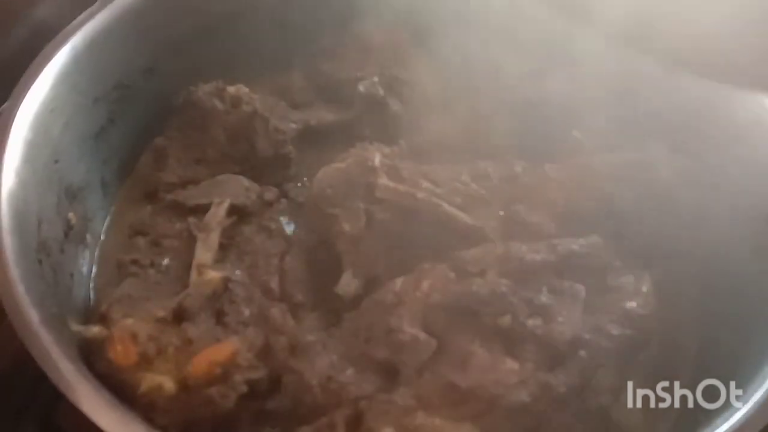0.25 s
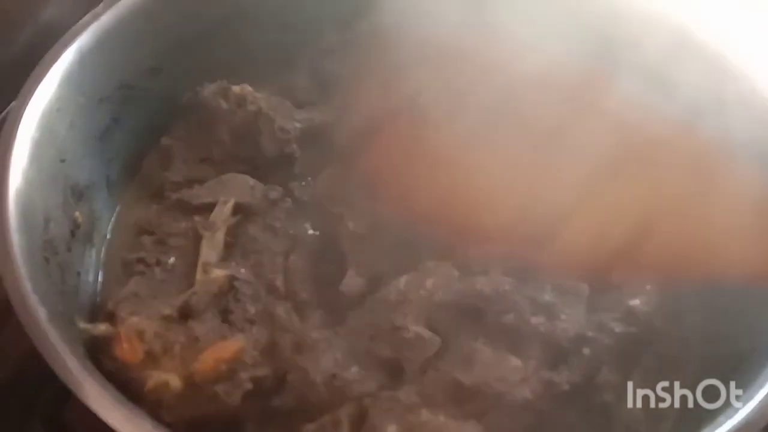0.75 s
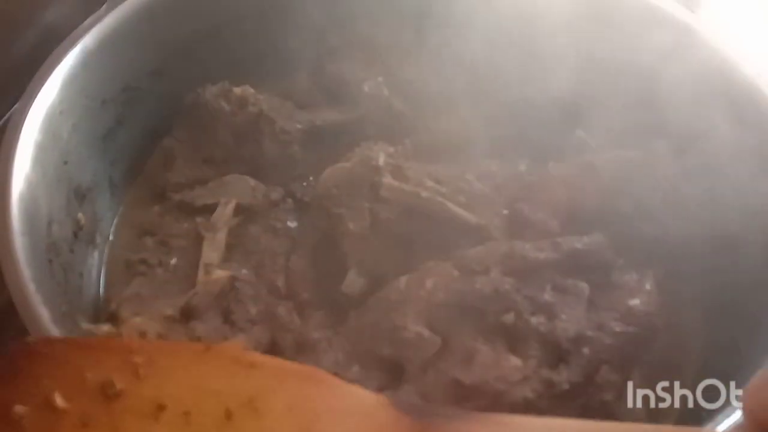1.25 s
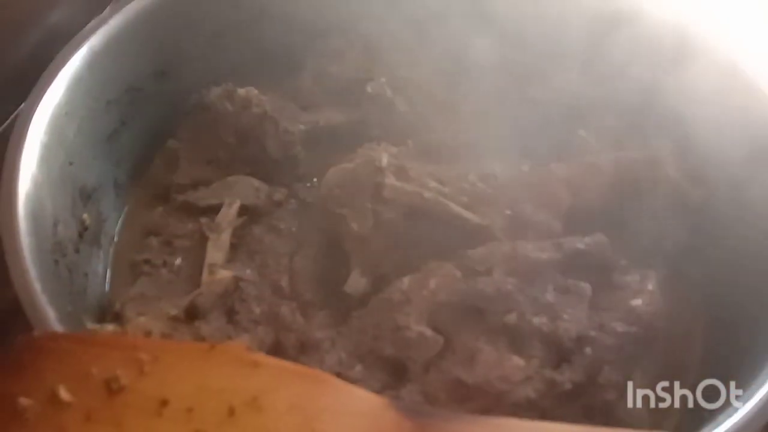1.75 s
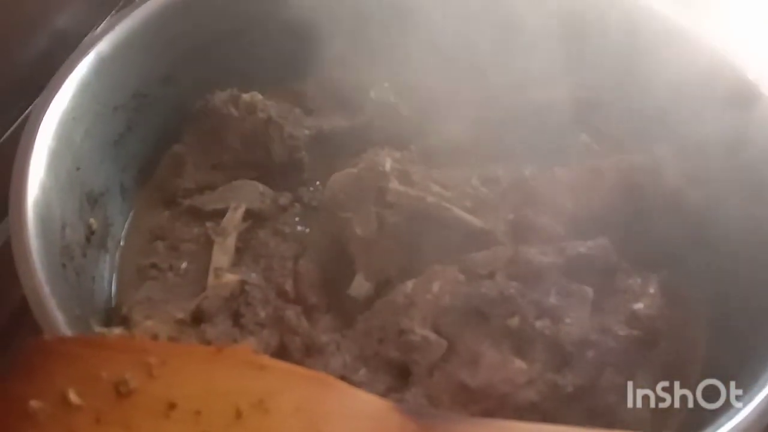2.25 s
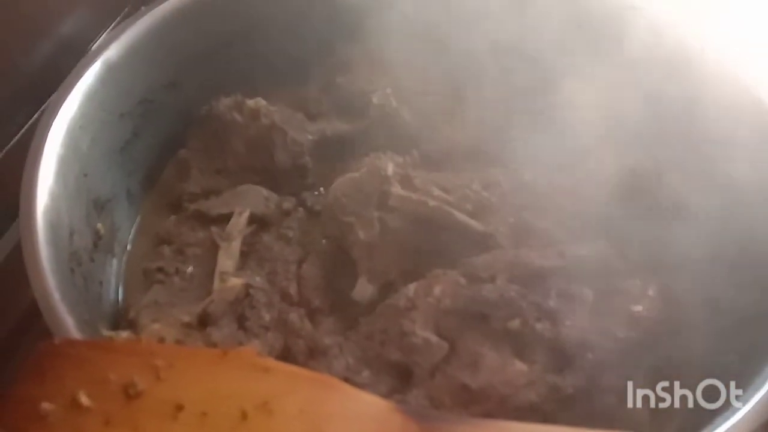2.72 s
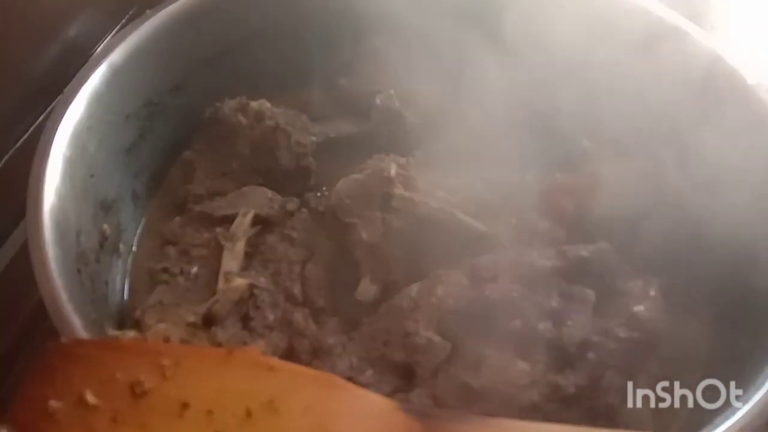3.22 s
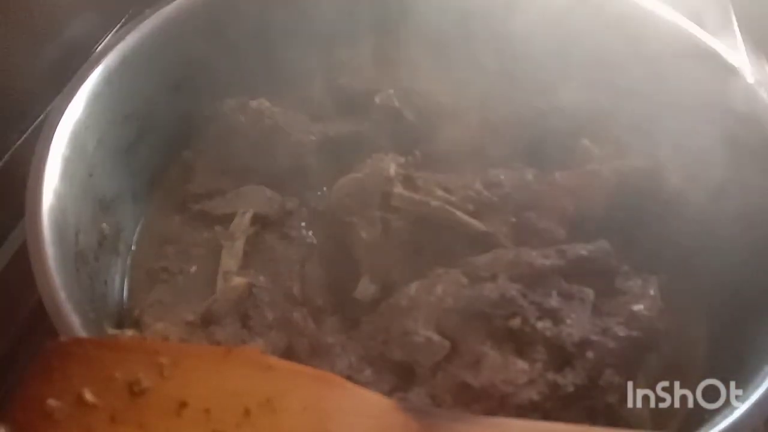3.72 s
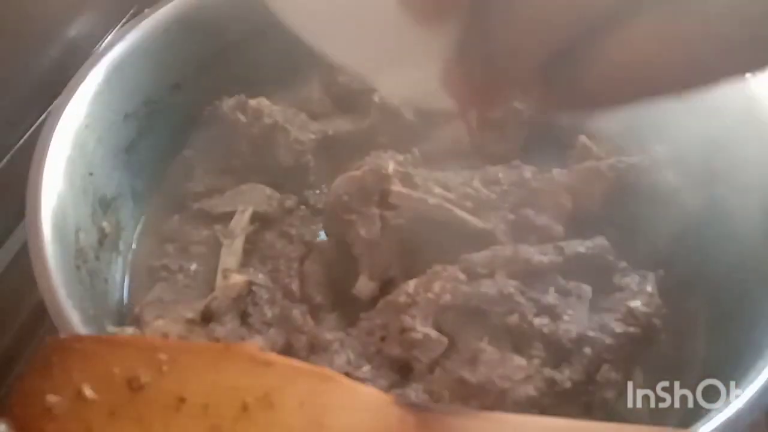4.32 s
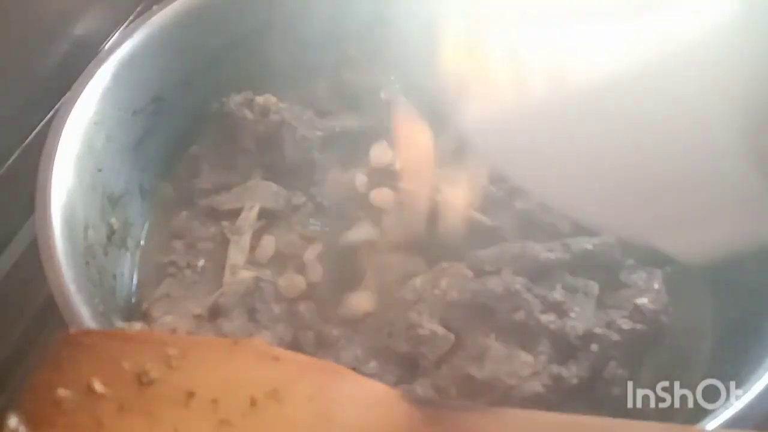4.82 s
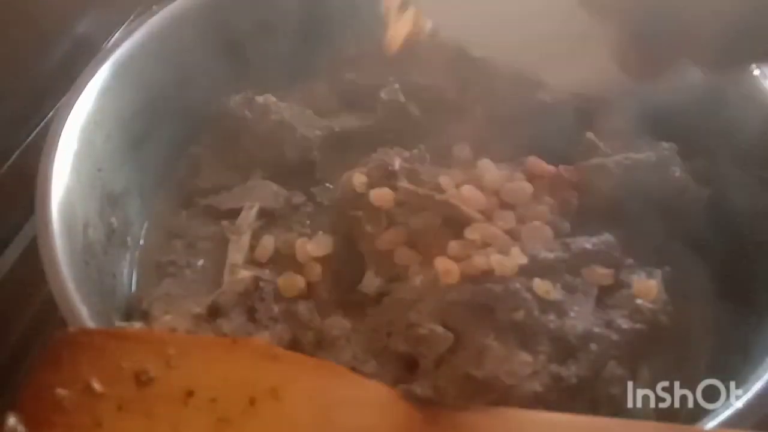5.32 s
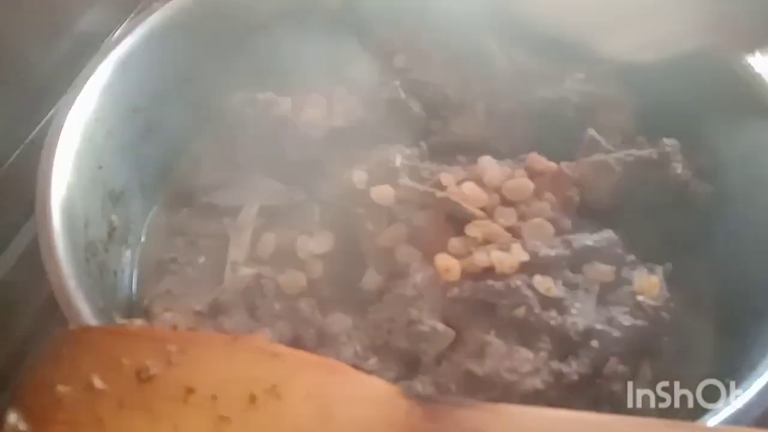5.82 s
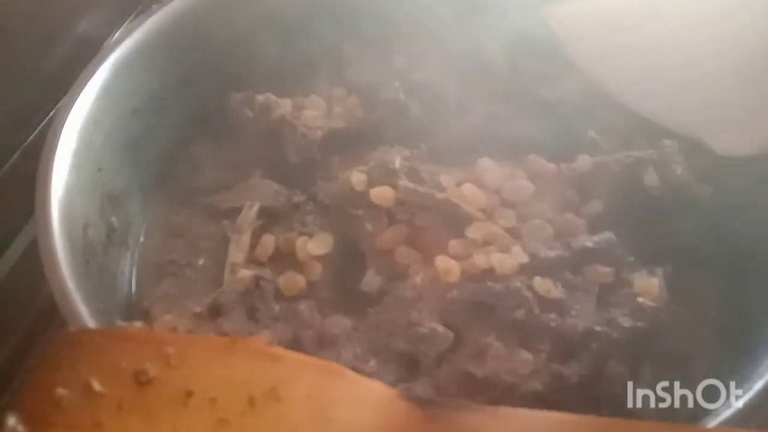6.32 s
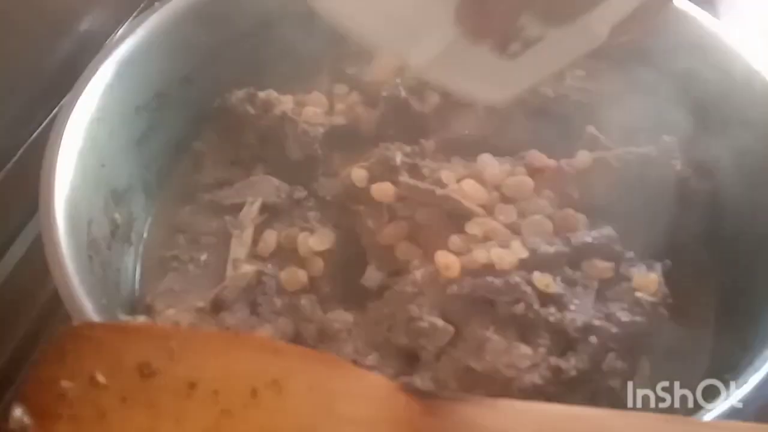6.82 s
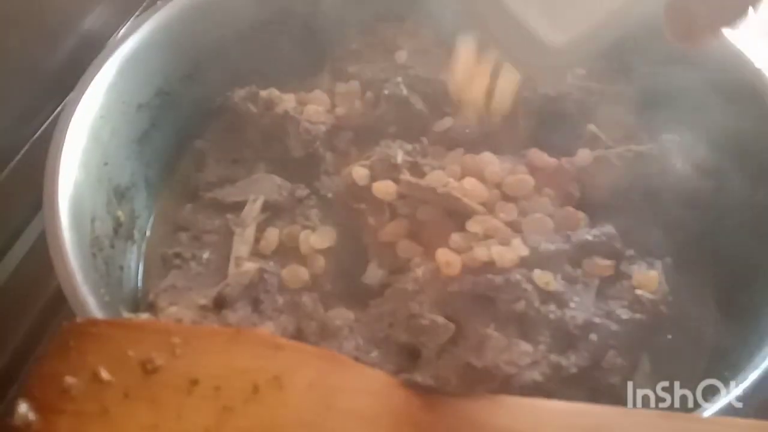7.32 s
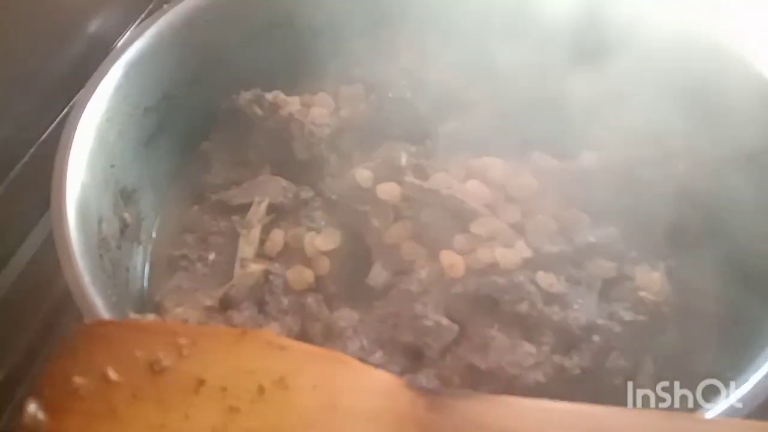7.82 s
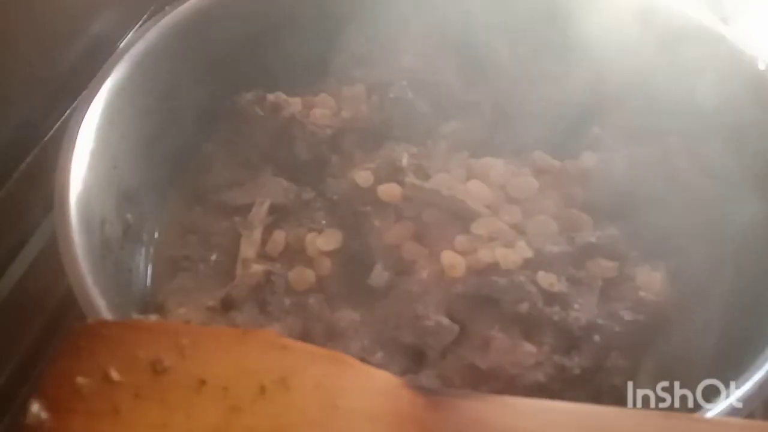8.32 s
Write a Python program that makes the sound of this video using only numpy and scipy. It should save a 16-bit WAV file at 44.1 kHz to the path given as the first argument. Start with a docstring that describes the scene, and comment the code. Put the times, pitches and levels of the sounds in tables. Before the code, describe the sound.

Close simmering, with muffled bubbles and fizzing fat; soft pot knocks and a scuff, later tapping chickpeas, a bright clank and a short steamy hiss.

```python
"""Meat simmers in thick sauce in a steel pot, heard close up: damped-sine bubbles plop and noisy fat fizzes,
with sharp filtered clicks as ticks and snaps. Early on, blows ring the pot's damped modes, then something scuffs
past it as filtered noise in jerks. Later, chickpeas tap and rattle out of a small dish (short modes) and land on the
meat and in the sauce (low bubble-like grains), and the dish clanks on the rim. It scrapes lightly as it is tipped
again. Near the end, a splash of sauce hisses on the hot wall as crackling, filtered noise."""
import sys
import numpy as np
from scipy import signal
from scipy.fft import rfft, irfft, next_fast_len
from scipy.io import wavfile

SR = 44100
rng = np.random.default_rng(int(sys.argv[2]) if len(sys.argv) > 2 else 0)


def generate_wav(signal):
    """Clip the signal to [-1, 1] and save it as 16-bit WAV at the path in sys.argv[1]."""
    frames = np.transpose(np.atleast_2d(signal))
    scaled = np.clip(frames, -1, 1) * 32767
    pcm = np.round(scaled).astype(np.int16)
    wavfile.write(sys.argv[1], SR, pcm)


N = 377363
T = np.arange(int(0.7 * SR)) / SR  # time within one event [s]
ATTACK_S = 0.0017  # time constant of a quick rise


def amp(db):
    """Level: decibels to linear gain."""
    return 10 ** (np.asarray(db) / 20)


def unit(x):
    """Normalisation: scale to rms 1."""
    return x / np.sqrt(np.mean(x ** 2) + 1e-20)


def crest(x):
    """Normalisation: scale to peak 1."""
    return x / (np.abs(x).max() + 1e-12)


def along(points, hz):
    """Interpolation of (frequency [Hz], value) points on a logarithmic frequency axis."""
    f, v = np.transpose(points)
    return np.interp(np.log(hz + 1), np.log(f + 1), v)


def gains(rows, outside=None):
    """Level contour: one gain per sample from (time [s], level [dB]) points."""
    s, db = np.transpose(rows)
    return amp(np.interp(np.arange(N) / SR, s, db, outside, outside))


def wobble(rate, size=N):
    """Random modulation: straight lines between normal random knots, rate a second."""
    knots = rng.standard_normal(int(size * rate / SR) + 4)
    return np.interp(np.arange(size) * rate / SR, np.arange(len(knots)), knots)


def colour(x, spectrum, tilt_db=0):
    """Minimum-phase filtering: a folded cepstrum makes it causal; the tilt [dB/octave] starts at 1 kHz."""
    size = 2 * next_fast_len(len(x) // 2 + 2048)
    hz = np.fft.rfftfreq(size, 1 / SR)
    octaves = np.log2(np.maximum(hz, 1000) / 4000)
    response = amp(along(spectrum, hz) + tilt_db * octaves)
    cepstrum = irfft(np.log(np.maximum(response, 1e-6)))
    cepstrum[1:size // 2] *= 2
    cepstrum[size // 2 + 1:] = 0
    return irfft(rfft(x, size) * np.exp(rfft(cepstrum)))[:len(x)]


def fade(t60, t=T):
    """Exponential damping: decay by 60 dB in t60 [s]."""
    return np.exp(-np.log(1000) * t / t60)


def held(hold, t60):
    """Envelope of a sustained flow: quick attack, hold [s] and exponential release."""
    return (1 - np.exp(-T / ATTACK_S)) * fade(t60, np.maximum(T - hold, 0))


def burst(t60):
    """Dense ring: noise under exponential damping."""
    return rng.standard_normal(len(T)) * fade(t60)


def add(track, s, sound):
    """Superposition: mix a sound in at time s."""
    start = max(round(s * SR), 0)
    track[start:start + len(sound)] += sound[:max(N - start, 0)]


def spurts(rows):
    """Intermittent flow: one half-sine swell for each (time [s], level [dB], length [s]) row."""
    flow = np.zeros(N)
    for s, db, length in rows:
        add(flow, s, amp(db) * np.sin(np.pi * np.minimum(T / length, 1)))
    return flow


def grains(rate, hz, spread, cycles, uneven_db, size):
    """Bubble acoustics: a random stream of tiny damped sines, each lasting a few cycles."""
    u = rng.random((int(rate * N / SR), 3))
    logistic = np.log(u[:, 1:2] / (1 - u[:, 1:2]))
    pitch = np.minimum(hz * np.exp(spread * logistic), SR / 2)
    turns = pitch * np.arange(size) / SR
    strength = amp(-uneven_db * np.log(u[:, 2:] + 0.02))  # a few grains are much stronger
    envelope = np.exp(-turns / cycles) * (1 - np.exp(-2 * turns))
    waves = strength * np.sin(2 * np.pi * turns) * envelope
    places = (u[:, :1] * N).astype(int) + np.arange(size)
    return unit(np.bincount(places.ravel(), waves.ravel(), N)[:N])


def catches(rate, size=N):
    """Impulse train: irregular tiny impacts of uneven strength, rate a second on average."""
    return unit(rng.standard_normal(size) * (rng.random(size) < rate / SR))


WAVER_RATE = 55  # changes a second


def ring(modes, scatter_db, waver=0):
    """Modal synthesis: damped modes of new strength each time, phase wavering by waver [turns, rms at knots]."""
    total = 0
    for hz, db, t60 in modes:
        strength = amp(db + scatter_db * rng.normal())
        turns = hz * T + rng.random() + waver * wobble(WAVER_RATE, size=len(T))
        total = total + strength * fade(t60) * np.sin(2 * np.pi * turns)
    return total


def hollow(x, gain, hz=1255, width_hz=70):
    """Cavity resonance: a narrow peak sings on after each bubble, by default that of the air in the pot."""
    return x + gain * signal.lfilter(*signal.iirpeak(hz, hz / width_hz, SR), x)


def bubble(hz, cycles, rise):
    """Bubble resonance: a bursting bubble's damped note swells and glides up as the hole opens."""
    turns = hz * T[:SR // 20]
    glide = 1 + rise * np.tanh(turns / 10)
    envelope = np.exp(-turns / cycles) * (1 - np.exp(-0.7 * turns))
    return np.sin(2 * np.pi * turns * glide) * envelope


PLOP_CYCLES, PLOP_RISE = 1.79, 0.092  # typical decay [cycles]; upward glide [share of pitch]
# Large bubbles bursting: (time [s], relative level [dB], pitch [Hz], following splutter level [dB])
PLOPS = [(0.009, -27.5, 1270, -65), (0.19, -28, 1070, -47), (0.209, -31, 1200, -53),
         (0.255, -29.5, 1110, -45), (0.301, -31.5, 1040, -51), (0.326, -32, 1140, -56),
         (0.441, -31.5, 1250, -45.5), (0.622, -31.5, 1050, -49), (0.677, -32.5, 1130, -57.5),
         (0.731, -31, 1180, -41), (0.794, -27, 1180, -51), (0.866, -34, 1190, -51), (0.942, -33, 1140, -47),
         (1.674, -28.5, 1270, -43.5), (1.764, -29, 1370, -46), (2.127, -31, 1610, -50.5),
         (2.218, -29.5, 1160, -51), (2.303, -24, 1540, -51.5), (2.359, -33.5, 1190, -41),
         (2.396, -35.5, 1200, -75), (2.513, -27.5, 1430, -43.5), (2.76, -33.5, 1900, -49),
         (2.859, -31, 880, -59), (2.889, -35, 1170, -65), (2.943, -29.5, 1120, -56),
         (3.055, -31, 1120, -44), (3.083, -31, 1710, -79), (3.221, -30, 1240, -63),
         (3.448, -26, 1380, -46.5), (3.463, -23, 1300, -46.5), (3.631, -33, 1110, -45),
         (3.695, -34.5, 1270, -74), (3.915, -33.5, 1190, -78), (4.162, -28, 1274, -78),
         (4.558, -32.5, 764, -40.5), (4.583, -27, 1940, -46), (4.618, -27, 1350, -46),
         (4.73, -25, 1260, -39.5), (5.079, -33, 1030, -68), (5.121, -28, 1530, -40.5),
         (5.402, -27.5, 1270, -55), (5.486, -28, 1295, -41), (5.575, -21, 1400, -36.5),
         (5.857, -30.5, 1190, -50.5), (6.39, -37, 1200, -45.5), (6.423, -32, 1095, -44),
         (6.853, -31, 1290, -51), (6.863, -32, 1330, -43), (6.968, -22, 1335, -36),
         (7.07, -30.5, 860, -42.5), (7.123, -31.5, 1140, -45.5), (7.136, -28.5, 1440, -56),
         (7.221, -34, 1260, -63), (7.35, -24.5, 1300, -55), (7.438, -30, 1180, -48),
         (7.548, -28.5, 1130, -44.5), (7.776, -32, 1190, -53.5), (7.832, -29, 1150, -52.5),
         (8.391, -28.5, 1730, -48.5)]
# Thick sauce muffles its bubbles: (frequency [Hz], gain [dB])
MUFFLING = [(300, 9), (900, 0.5), (2100, 1.5), (3000, 6.5), (8000, -39)]


def plops():
    """Bubble resonance: each large burst is a short note, dry or singing, soon followed by a weaker one."""
    out = np.zeros(N)
    for (s, db, hz, _), (lag, detune, life) in zip(PLOPS, rng.random((len(PLOPS), 3))):
        large = crest(bubble(hz, PLOP_CYCLES * (0.5 + life), PLOP_RISE))
        # the follower's pitch lies within half an octave either way
        follower = crest(bubble(hz * 2 ** (detune - 0.5), PLOP_CYCLES, PLOP_RISE))
        add(out, s, amp(db - 2.5) * large)
        add(out, s + 0.003995 + 0.016 * lag, amp(db - 10.5) * follower)
    return hollow(colour(out, MUFFLING), gain=0.39)


# Steam escapes through the hole until the sauce closes it
SPLUTTER_HOLD_S, SPLUTTER_T60_S = 0.037, 0.092
# Bubbling spectrum of the sauce: (frequency [Hz], relative level [dB])
SAUCE = [(100, -25.5), (700, -8.5), (1200, -3), (1500, -5.5), (2250, 0), (3000, -8), (5000, -7),
         (8000, -69)]


def splutter(blips):
    """Cavity resonance: each burst hole colours a rush of blips by two peaks; returns flow and sound."""
    surge, sound = np.zeros(N), np.zeros(N)
    shape = held(SPLUTTER_HOLD_S, SPLUTTER_T60_S)[:SR // 4]
    puffs = colour(blips, SAUCE)
    uppers = rng.random(len(PLOPS))
    starts = rng.integers(N - len(shape), size=len(PLOPS))
    for (s, _, hz, db), upper, start in zip(PLOPS, uppers, starts):
        puff = puffs[start:start + len(shape)]
        lower_peak = hollow(puff, 1.1, hz, 240)
        hole = hollow(lower_peak, 1.6, hz * (1.193 + 0.51 * upper), 100)
        add(surge, s, amp(db) * shape)
        add(sound, s, amp(db) * shape * unit(hole))
    return surge, sound


# Strength of the simmer between large bubbles, before clumping: (time [s], level [dB])
BOIL = [(0, -49), (1.08, -58.5), (1.26, -46), (1.38, -53.5), (1.9, -54.5), (2.2, -46), (2.45, -51),
        (2.75, -50), (3.25, -55), (3.55, -46), (3.87, -53), (4.85, -45.5), (5.65, -45.5), (6.05, -52.5),
        (6.5, -49.5), (7.13, -49.5), (7.95, -59), (8.22, -49), (8.56, -58.5)]
# Strength of the fat's fizz, before an 8.5 dB lift: (time [s], level [dB])
SIZZLE = [(0, -61.5), (1.1, -65.5), (2.3, -63), (4.1, -64), (5.6, -58), (6.2, -65), (8.56, -61)]
# Fizz spectrum: (frequency [Hz], relative level [dB])
FIZZ = [(1800, 1), (3000, -3), (4300, -5.5), (5500, 1.5), (6300, -15.5), (7700, -5.5), (9200, -8),
        (10300, -14), (13400, -14), (15000, -11.5)]
# Spectrum of low gulps, churning and thumps: (frequency [Hz], relative level [dB])
DEEP = [(20, -40), (60, -12.5), (135, -3.5), (290, -4.5), (400, -11.5), (700, -12), (2500, -100)]
CHURN_DB = -55  # dull churning under the meat, rms


def simmer():
    """Stochastic bubbling: small bubbles clump, splutters throw up more fizz, sauce gulps and churns below."""
    clumps = wobble(36)
    boil = gains(BOIL) * amp(2.64 * clumps)
    small = grains(rate=420, hz=1350, spread=0.18, cycles=3.8, uneven_db=2.2, size=500)
    small = small + 0.45 * rng.standard_normal(N)
    surge, sputter = splutter(small + 0.5 * rng.standard_normal(N))
    bubbling = np.hypot(boil, surge)
    body = unit(hollow(colour(small, SAUCE), gain=2.3))

    tiny = grains(rate=1100, hz=7770, spread=0.128, cycles=11.7, uneven_db=5.0, size=200)
    tiny = tiny + rng.standard_normal(N)
    flicker = amp(1.76 * clumps + 2.97 * wobble(130))
    fizz = unit(colour(tiny * flicker, FIZZ) * bubbling ** 0.55)

    gulps = grains(rate=45, hz=177.8, spread=0.249, cycles=2.5, uneven_db=1.5, size=3000)
    churn = unit(colour(rng.standard_normal(N), DEEP)) + 0.92 * unit(colour(gulps, DEEP))
    deep = unit(churn * amp(2.6 * wobble(30)) * bubbling ** 0.5)
    return boil * body + amp(-2.0) * sputter + amp(8.5) * gains(SIZZLE) * fizz + amp(CHURN_DB) * deep


# Sharp ticks and snaps, of spitting fat or of the dish:
# (time [s], snap peak [dB], treble tilt [dB/octave], rattle relative to snap [dB])
SNAPS = [(0.1113, -12, 8, -20), (1.246, -24.5, -3.5, -2.5), (5.456, -24.5, -1.5, -4),
         (5.47, -17.5, 5, -7.5), (5.626, -19, 19, -15), (5.8, -26.5, 4, 2.5), (6.666, -29, 4, -0.5),
         (7.821, -20, 4.5, -18)]
# Spectrum of a snap, and of the chickpeas' noise: (frequency [Hz], relative level [dB])
SNAP_SPECTRUM = [(150, -54.5), (700, -5), (1250, 5), (2500, 2.5), (3600, -9.5), (5200, -3), (6200, -14.5),
                 (7200, -8), (15500, -38)]


def snaps():
    """Impulsive radiation: a short snap rattles between the pot's walls as decaying noise."""
    out = np.zeros(N)
    for s, db, tilt_db, rattle_db in SNAPS:
        click = signal.unit_impulse(len(T)) + 0.17 * burst(0.027)
        snap = crest(colour(click, SNAP_SPECTRUM, tilt_db))
        rattle = crest(colour(burst(0.1), SNAP_SPECTRUM, tilt_db))
        add(out, s, amp(db) * (snap + amp(rattle_db) * rattle))
    return out


# The dish's modes: (mean frequency [Hz], mean level [dB], t60 [s])
DISH = [(3480, -5.5, 0.017), (5420, 5.5, 0.02), (5590, -3.5, 0.024), (6260, -8, 0.012), (6560, -9, 0.034),
        (8940, -10.5, 0.023), (10660, -14, 0.016)]
DISH_DETUNE = 0.015  # the load shifts the notes from tap to tap [standard deviation, share of pitch]


def dish():
    """Modal synthesis: one tap's ring of the dish, a little different each time."""
    modes = [(hz * (1 + DISH_DETUNE * rng.normal()), db, t60) for hz, db, t60 in DISH]
    return ring(modes, scatter_db=6)


# Chickpeas striking the dish: (time [s], peak level [dB])
PEAS = [(4.4604, -27.5), (4.49, -32), (4.67, -31.5), (4.901, -26.5), (4.931, -21), (5.258, -28.5),
        (5.432, -23.5), (5.577, -24), (5.645, -27), (5.964, -27.5), (5.9842, -21.5), (6.563, -34.5)]
# Handfuls sliding down the dish: (time [s], level [dB], length [s])
ROLL = [(4.73, -48, 0.079), (4.888, -40, 0.037), (5.031, -43.5, 0.055), (5.298, -43.5, 0.092),
        (5.6, -44, 0.13), (6.093, -49, 0.067), (6.555, -49.5, 0.09)]
# A light scrape as the dish is tipped again: (time [s], level [dB], length [s])
GRAZE = [(6.39, -55, .12)]
# The scrape's two notes: (lower [Hz], upper [Hz])
GRAZE_HZ = (3180, 3660)


def chickpeas():
    """Impact excitation: chickpeas tap the dish and rattle down it in spurts; once it scrapes lightly."""
    out = np.zeros(N)
    for s, db in PEAS:
        tap = crest(dish()) + 0.29 * crest(colour(burst(0.071), SNAP_SPECTRUM))
        tap = crest(tap * (1 - np.exp(-T / ATTACK_S)))
        add(out, s - ATTACK_S / 2, amp(db) * tap)
    rings = sum(signal.fftconvolve(catches(110), dish())[:N] for _ in range(6))
    rolling = unit(rings) + 0.45 * unit(colour(catches(500), SNAP_SPECTRUM))
    graze = unit(sum(signal.lfilter(*signal.iirpeak(hz, 40, SR), catches(900)) for hz in GRAZE_HZ))
    return out + spurts(ROLL) * rolling + spurts(GRAZE) * graze


# Chickpeas landing in the sauce: (time [s], level [dB], length [s])
LANDING = [(4.69, -50, 0.23), (5.19, -51, 0.13), (5.56, -46, 0.12), (5.75, -43, 0.088), (6.1, -43.5, 0.041),
           (6.96, -53, 0.12)]


def landings():
    """Bubble acoustics: chickpeas plop into the sauce and thump softly on the meat, as damped grains."""
    plips = grains(rate=260, hz=1100, spread=0.18, cycles=2.5, uneven_db=2, size=600)
    thumps = grains(rate=60, hz=162.0, spread=0.15, cycles=3.6, uneven_db=3.5, size=4000)
    return spurts(LANDING) * (plips + amp(2.0) * unit(colour(thumps, DEEP)))


# Blows on the pot, the dish's clank on the rim among them: (time [s], level over the first 50 ms [dB],
# relative thud [dB], relative clank [dB], relative shudder of the contents [dB], share of free ring length)
BLOWS = [(0.48, -21, -3.5, -24.5, -19, 0.85), (1.244, -44.5, -9.5, -10, -3, 1),
         (1.42, -28.5, -24.5, -34, -10, 0.66), (5.6872, -20.5, -43, -0.5, -17.5, 1),
         (5.714, -19.5, -39.5, -10.5, -17.5, 0.81)]
# The pot's modes: (frequency [Hz], relative level [dB])
POT = [(108, -5), (138, -3), (220.5, 4), (260, -3), (301, 0), (435, 4), (576, -10), (835, -5), (1103, -6),
       (1310, -8), (1355, -4), (1497, -3), (1724, 1), (1885, -8), (1960, -7), (2990, -5), (3273, -3),
       (3558, -7), (3806, -5), (3840, -5), (4086, 1), (4178, -2), (5090, 0), (5276, 0), (5367, 0),
       (5462, 0), (6663, -1)]
# Free ring length of the modes: (frequency [Hz], t60 [s])
POT_RING = [(140, 0.28), (220, 0.64), (280, 0.24), (1450, 0.47), (3100, 0.31), (6600, .16)]
# Dense ring of a soft blow: (frequency [Hz], relative level [dB])
THUD = [(30, -56.5), (110, 3), (480, -8.5), (680, -19), (1300, -5), (2300, -26), (4400, -29), (5100, -14),
        (15000, -49.5)]
# Dense ring of a hard blow: (frequency [Hz], relative level [dB])
CLANK = [(700, -35), (1300, -15), (2600, -13), (3500, -2), (4600, -3.5), (5350, 4.5), (9500, -19),
         (15500, -33.5)]
# Meat and sauce shaken by a blow: (frequency [Hz], relative level [dB])
SHUDDER = [(25, -30), (140, 1), (700, -6), (2000, 0), (3200, -24.5), (9000, -45)]
WAVER = 0.04  # phase waver of the pot's ring [turns]


def blows():
    """Modal excitation: soft blows wake low modes, hard ones high; both ring the middle, shake the contents."""
    out = np.zeros(N)
    for s, db, thud_db, clank_db, shudder_db, share in BLOWS:
        contact = [(150, thud_db + 2.5), (1000, thud_db), (1350, 0.015),
                   (1720, max(thud_db, clank_db - 10.5) - 1.0), (3000, clank_db - 2.0)]
        modes = [(hz, level + along(contact, hz), share * along(POT_RING, hz)) for hz, level in POT]
        tone = ring(modes, scatter_db=0.5, waver=WAVER)
        thud_noise = burst(0.066) + amp(-12.0) * burst(0.15)
        thud = amp(thud_db + 19) * crest(colour(thud_noise, THUD))
        shaking = unit(colour(rng.standard_normal(len(T)), SHUDDER))
        shudder = amp(shudder_db) * shaking * fade(0.27)
        clank = amp(clank_db + 26.5) * crest(colour(burst(0.052), CLANK))
        swell = 1 - np.exp(-T / (0.00053 + 0.0021 * amp(clank_db)))  # a stronger clank rises more slowly
        blow = (tone + thud + clank + shudder) * swell
        add(out, s, amp(db) * blow / np.std(blow[:SR // 20]))
    return out


# Jerks of something scuffing past: (time [s], length [s], rumble level [dB], rasp level [dB])
SCUFF = [(2.475, 0.088, -47.5, -48), (2.567, 0.01, -42, -44), (2.581, 0.003, -50, -37),
         (2.609, 0.033, -36.5, -38.5), (2.642, 0.05, -32, -50)]
# Rumble spectrum: (frequency [Hz], relative level [dB])
RUMBLE = [(40, -31), (130, 2), (310, 1.5), (620, -13), (1280, -8.5), (2400, -56)]
# Rasp spectrum: (frequency [Hz], relative level [dB])
RASP = [(400, -4), (1400, -2.5), (2300, -2), (2900, -4), (3700, -25), (5600, -14), (12000, -40)]
SCUFF_RELEASE_S = 0.2  # t60 after each jerk


def scuff():
    """Stick-slip friction: a rough slide catches in jerks and ends in a soft bump."""
    out = np.zeros(N)
    for s, length, rumble_db, rasp_db in SCUFF:
        rumble = unit(colour(rng.standard_normal(len(T)), RUMBLE))
        rough = catches(373, size=len(T)) + 0.5 * rng.standard_normal(len(T))
        rasp = unit(colour(rough, RASP))
        jerk = amp(rumble_db) * rumble + amp(rasp_db) * rasp
        add(out, s, held(length, SCUFF_RELEASE_S) * jerk)
    return out


# Sauce flashing to steam on the wall: (time [s], level [dB])
SPLASH = [(8.01, -92), (8.045, -42), (8.07, -46.5), (8.1, -34.5), (8.16, -44.5), (8.178, -37.5), (8.2, -54),
          (8.29, -64)]
# Steam spectrum: (frequency [Hz], relative level [dB])
STEAM = [(600, -32), (1050, -13), (1300, 0), (1700, -10.5), (7600, -19), (15500, -26)]


def splash():
    """Flash boiling: sauce hisses briefly on hot steel, as noise with rapid random modulation."""
    crackle = rng.standard_normal(N) * amp(2.6 * wobble(700))
    return gains(SPLASH, outside=-120) * unit(colour(crackle, STEAM))


# Reverberation time: (frequency [Hz], t60 [s])
ROOM = [(150, 0.26), (1500, 0.28), (15000, 0.1)]


def kitchen(x):
    """Reverberation: convolution with noise that grows duller as it dies, after a 5 ms delay."""
    hz, t, z = signal.stft(rng.standard_normal(SR // 2), SR, nperseg=256)
    damping = fade(along(ROOM, hz)[:, None], t)
    tail = signal.istft(z * damping, SR, nperseg=256)[1]
    response = np.pad(tail / np.linalg.norm(tail), (SR // 200, 0))
    return signal.fftconvolve(x, response)[:N]


def scene():
    """Mid-side stereo: all sources sit in the middle; a faint diffuse side signal,
    strongest in the treble of the blows, widens the picture."""
    small = plops() + snaps() + chickpeas()
    knocks = blows()
    bed = simmer() + landings()
    room = kitchen(amp(-8.0) * small + amp(-7) * knocks)
    mid = small + knocks + bed + scuff() + splash() + room
    blow_treble = colour(knocks, [(2300, -73), (4800, -31.5), (8000, -22)])
    side = kitchen(amp(-31.5) * (bed + small) + blow_treble)
    return np.array([mid + side, mid - side])


TOP_HZ = 15700  # upper band limit


def record(dry):
    """Band limiting: a sharp low-pass in the frequency domain keeps nothing above the limit."""
    size = next_fast_len(N + SR // 2)
    passed = np.fft.rfftfreq(size, 1 / SR) < TOP_HZ
    return irfft(rfft(dry, size) * passed, size)[:, :N]


dry = scene()
out = record(dry)
generate_wav(out)
```